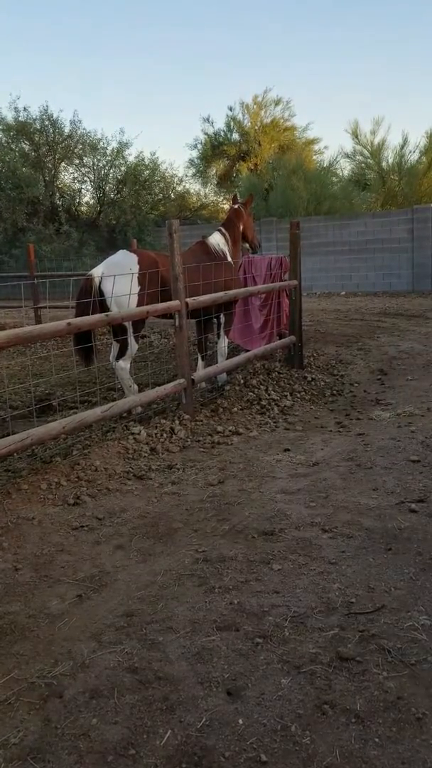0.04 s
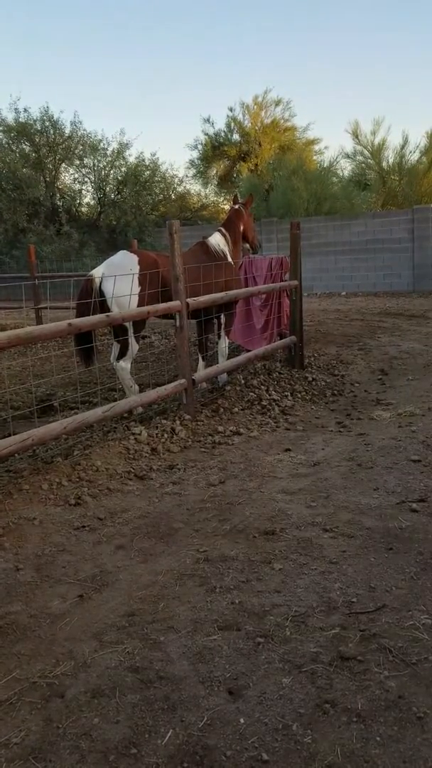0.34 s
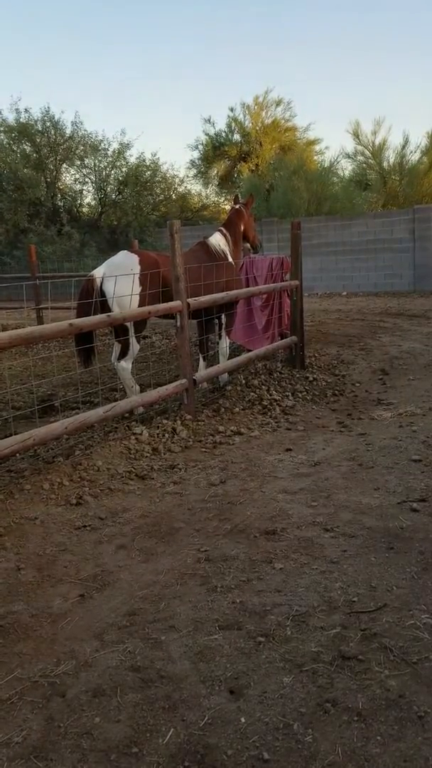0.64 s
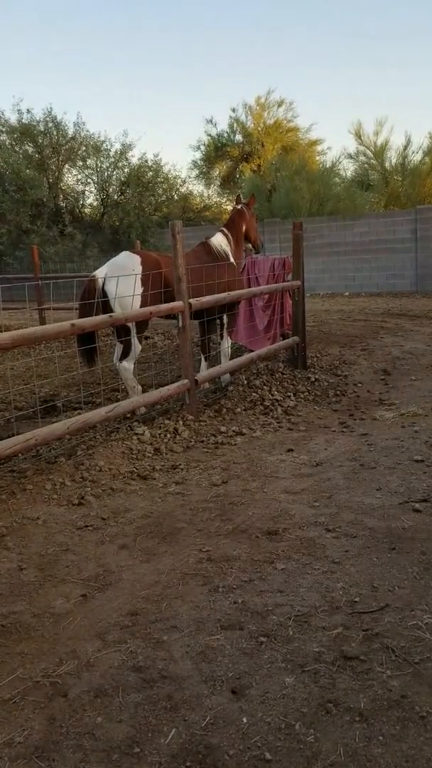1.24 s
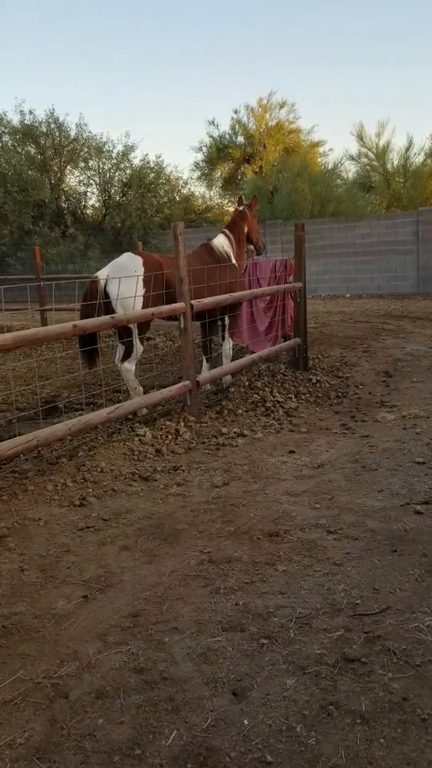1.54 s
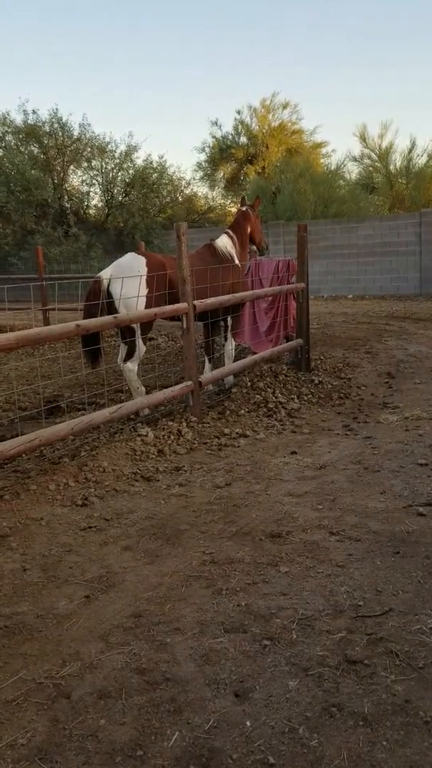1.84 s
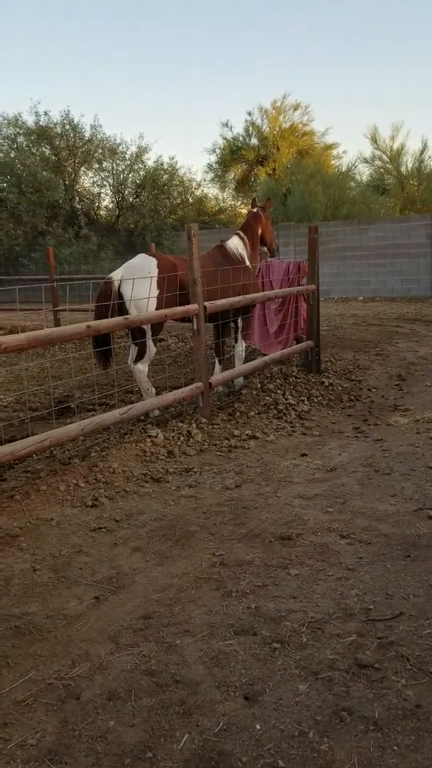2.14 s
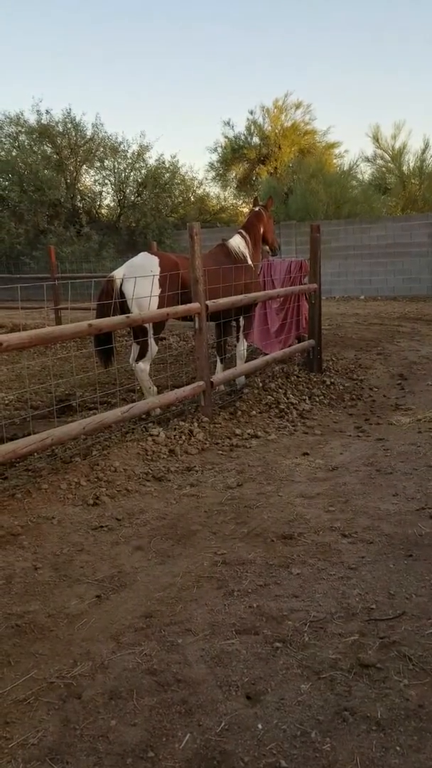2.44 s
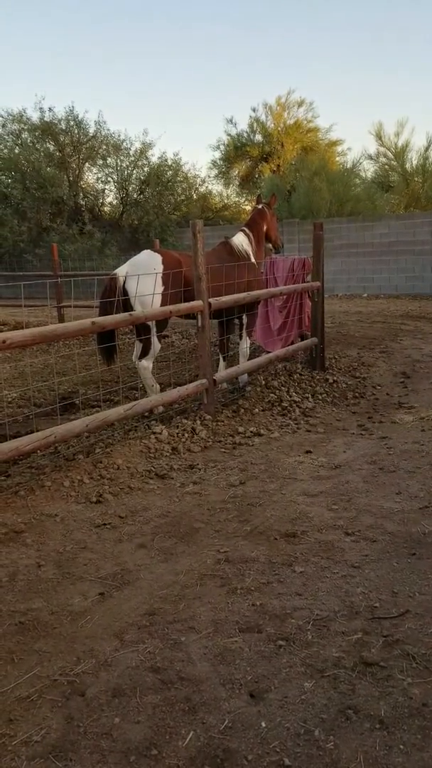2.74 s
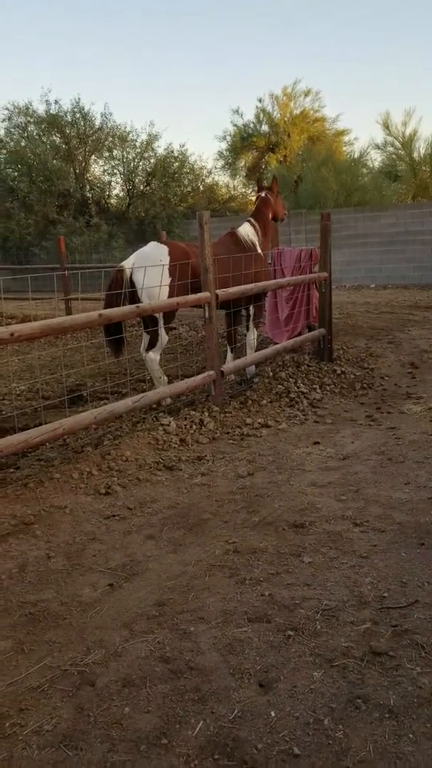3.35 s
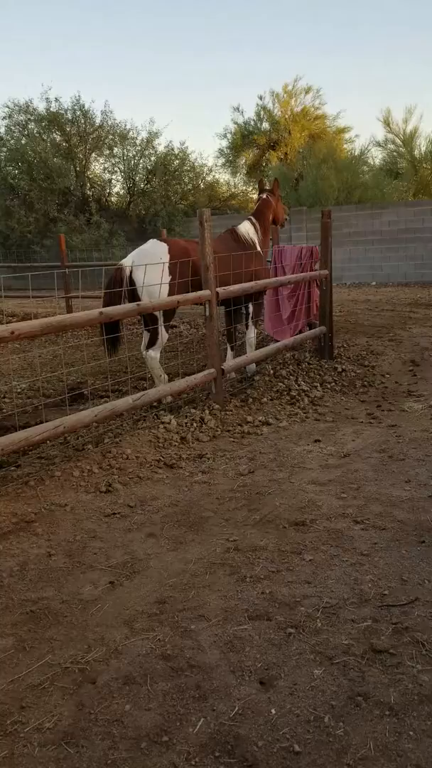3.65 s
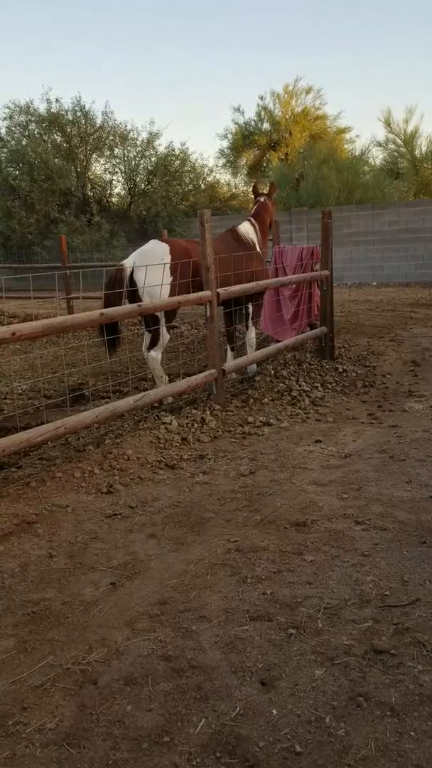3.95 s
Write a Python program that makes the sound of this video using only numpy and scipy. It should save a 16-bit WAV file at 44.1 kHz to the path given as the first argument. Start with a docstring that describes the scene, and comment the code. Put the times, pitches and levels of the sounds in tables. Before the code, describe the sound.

A horse neighs loudly in an outdoor dirt yard. First, grit rustles faintly over a distant hum; then soft thumps and a thin squeal lead into the hoarse, shaking call, caught in stereo with a short echo.

```python
"""A low hum and rumble far off, and grit rustling in a dirt yard, on a stereo microphone.
About three seconds in come soft thumps on packed earth, then a horse whinnies: a thin falling squeal
breaks into a loud, hoarse, shaking neigh that sinks in pitch. Its vocal folds beat unevenly, with a rasp
of air and a second, whistling voice of the larynx, coloured by throat and nose.
The yard adds a short echo to the call."""
import sys
import numpy as np
from scipy import signal
from scipy.fft import rfft, irfft
from scipy.io import wavfile
from scipy.ndimage import uniform_filter1d

SR = 44100
rng = np.random.default_rng(int(sys.argv[2]) if len(sys.argv) > 2 else 0)


def file_out(sig):
    """Save sig as 16-bit WAV at sys.argv[1]."""
    # one column per channel
    cols = np.atleast_2d(sig).T
    # limit, then scale
    lim = np.clip(cols, -1, 1)
    pcm = np.round(lim * 32767).astype(np.int16)
    wavfile.write(sys.argv[1], SR, pcm)


N = 176400

# Colour of the horse's throat and mouth. Each row: frequency in Hz, gain in dB.
THROAT_COLOUR = [(400, -3), (800, -6), (885, -4), (980, -0.5), (1100, 1.5), (1210, 3.5), (1310, -1.5),
                 (1420, -1.5), (1650, -2), (1840, -1), (2030, 0), (2200, -4), (2450, -9), (2630, -11.5),
                 (2860, -24), (3120, -4), (3450, -13), (3850, -12), (4200, -26), (4650, -26.5), (5100, -32),
                 (5900, -24), (6450, -34), (6850, -35.5), (8000, -40.5), (9600, -45), (15000, -44)]


def undb(db):
    """Decibels to gain."""
    return 10 ** (np.asarray(db) / 20)


def unit(x):
    """Scale to rms 1."""
    return x / np.sqrt(np.mean(x ** 2) + 1e-18)


def curve(rows, col=1):
    """A column of a table, joined by straight lines in time."""
    rows = np.array(rows)
    return np.interp(np.arange(N) / SR, rows[:, 0], rows[:, col])


def swell(rows, col=1):
    """Gain from a dB column, opening over the 5 ms before its first row."""
    gate = np.clip((np.arange(N) / SR - rows[0][0]) * 200 + 1, 0, 1)
    return undb(curve(rows, col)) * gate


def across(points, f):
    """A (Hz, value) table read on a log-frequency axis."""
    points = np.array(points)
    return np.interp(np.log(f), np.log(points[:, 0]), points[:, 1])


def shape(x, response):
    """Filter by a function of frequency."""
    f = np.fft.rfftfreq(2 * N, 1 / SR) + 1e-3
    return irfft(rfft(x, 2 * N) * response(f))[..., :N]


def colour(x, points):
    """Filter by a (Hz, dB) table."""
    return shape(x, lambda f: undb(across(points, f)))


def resonate(x, modes, bypass_db):
    """Pass a sound through narrow resonances; some of it goes by them."""
    return shape(x, lambda f: undb(bypass_db)
                 + sum(undb(db) / (1 + 2j * (f - hz) / width) for hz, width, db in modes))


def band(hz, width_hz):
    """Noise in a resonance, rms 1."""
    return unit(shape(rng.standard_normal(N), lambda f: 1 / (1 + ((f - hz) / width_hz) ** 2)))


def wander(rate_hz):
    """Random motion mostly slower than the rate, rms 1."""
    return band(0, rate_hz)


def turn(hz):
    """Phase of an oscillator."""
    return 2 * np.pi * np.cumsum(hz) / SR


def steady(x):
    """Hold a voice at rms 1 so that its envelope alone sets the level."""
    return x / np.sqrt(np.abs(uniform_filter1d(x ** 2, SR // 30)) + 1e-12)


def fade(start, attack, decay):
    """Attack and exponential release, times in seconds."""
    age = np.maximum(np.arange(N) / SR - start, 0)
    return (1 - np.exp(-age / attack)) * np.exp(-np.minimum(age / decay, 20))


def distant_hum():
    """Rumble and a wavering hum from far beyond the yard, wide in the treble."""
    # The far-off air, then the extra colour of its side signal. Each row: frequency in Hz, gain in dB.
    air_colour = [(15, -43), (25, -15.5), (80, -7), (94, -1), (113, -15), (130, -4), (144, -7), (161, -7.5),
                  (174, -11), (222, -10.5), (255, -16.5), (284, -13.5), (316, -17), (361, -15.5),
                  (710, -34), (955, -29), (1550, -32), (2260, -42), (3050, -37), (4450, -37.5), (5090, -31),
                  (5520, -36), (6490, -37), (9460, -43.5), (15800, -40)]
    side_colour = [(30, -29), (140, -18.5), (300, -18), (600, -6.5), (1200, -7), (3000, 2.5), (15000, -3.5)]
    treble_dip = [(2000, 1), (4000, -5.5), (9000, -5.5), (14000, -0.96)]
    mid, side = colour(colour(rng.standard_normal((2, N)), air_colour), treble_dip)
    air = unit(mid + np.array([[1], [-1]]) * colour(side, side_colour))
    return air * undb(-52 + 0.85 * wander(12)) + undb(-54) * band(146.2, width_hz=9)


def grit():
    """Short crunches of dry grit: each a ringing burst of grains with a faint tail."""
    # Each row: start in seconds, relative level in dB, centre in Hz, left minus right in dB.
    crunches = [(0.049, -42, 4700, -3), (0.1775, -48.5, 3740, -2), (0.198, -51, 7480, 1),
                (0.2893, -34.5, 6200, -2), (0.3024, -51, 6070, -4.5), (0.5057, -50.5, 7260, -3.0),
                (0.5883, -49, 3200, -6), (0.63, -49.5, 4930, -2.5), (0.8016, -50.5, 3160, -7),
                (0.8664, -48, 7300, -2), (0.9356, -53.5, 5230, -2.5), (1.5436, -52, 3230, -2.5),
                (1.6402, -54, 7760, 1.0), (1.7175, -51, 7300, -2.5), (1.8253, -47, 7060, -2),
                (1.936, -44, 6850, -4.0), (1.9782, -50, 7940, 2), (2.0943, -49.5, 5130, -5),
                (2.137, -49, 7450, -2), (2.237, -51.5, 8770, 4), (2.4737, -53.5, 9300, 5),
                (2.5366, -55, 7420, -8), (2.5672, -49, 8050, 3), (2.798, -50, 7660, -4),
                (2.9508, -44, 6800, -5), (3.038, -51, 3520, -12)]
    attack_s, decay_s, tail_s = .0006, .0023, .029
    gain_db, grain_spread_db, relative_width = -3.5, 3.5, .19
    size = SR // 5
    age = np.arange(size) / SR
    release = np.exp(-age / decay_s) + undb(-11) * np.exp(-age / tail_s)
    envelope = (1 - np.exp(-age / attack_s)) * release
    out = np.zeros((2, N + size))
    for start, db, hz, pan in crunches:
        grains = rng.standard_normal((2, size)) * undb(grain_spread_db * rng.standard_normal(size))
        ring = signal.lfilter(*signal.iirpeak(hz, 1 / relative_width, fs=SR), grains)
        hiss = np.diff(grains, prepend=0)
        crunch = (unit(ring) + undb(-8) * unit(hiss)) * envelope
        i = int(start * SR)
        out[:, i:i + size] += crunch * undb(db + gain_db + np.array([[pan], [-pan]]) / 2)
    return out[:, :N]


def crackle():
    """Single grains tick faintly at random between the crunches."""
    # Each row: time in seconds, level in dB.
    level = [(0, -77.5), (.9, -67), (1.1, -73.5), (1.55, -77.5), (1.7, -67.5), (2.3, -70.5), (2.7, -66),
             (3.3, -62)]
    # Colour of the grains. Each row: frequency in Hz, gain in dB.
    grain_colour = [(1200, -20), (3000, -10.5), (5500, -6), (6700, -8), (7500, 3), (8400, -13.5),
                    (15000, -9)]
    ticks_per_s, decay_s = 130, .0022
    ticks = (rng.random(N) < ticks_per_s / SR) * undb(2 * rng.standard_normal(N))
    envelope = signal.lfilter([1], [1, -np.exp(-1 / (decay_s * SR))], ticks)
    grains = envelope * rng.standard_normal((2, N))
    return undb(curve(level)) * unit(colour(grains, grain_colour))


def thumps():
    """Dull knocks on packed earth, each a low boom with a dry scuff."""
    # Each row: start in seconds, boom gain in dB, scuff gain in dB.
    knocks = [(3.027, -50, -40.5), (3.039, -21, -61), (3.085, -62, -47)]
    # Colour of scuffed earth. Each row: frequency in Hz, gain in dB.
    scuff_colour = [(150, 5.5), (450, 0), (700, -0.5), (1300, 0.5), (2400, -8.5), (2900, -20), (3500, -8),
                    (4300, -19), (12000, -32)]
    boom_hz, attack_s, boom_decay_s, scuff_decay_s = 100.6, .004, .0096, .027
    t = np.arange(N) / SR
    scuff = unit(colour(rng.standard_normal(N) + 0.49 * rng.standard_normal((2, N)), scuff_colour))
    out = np.zeros((2, N))
    for start, boom_db, scuff_db in knocks:
        boom = np.cos(2 * np.pi * boom_hz * (t - start))
        out += undb(boom_db) * fade(start, attack_s, boom_decay_s) * boom
        out += undb(scuff_db) * fade(start, attack_s, scuff_decay_s) * scuff
    return out


def squeal():
    """The thin, raspy falling tone that opens the call."""
    # Each row: time in seconds, pitch in Hz, relative level in dB.
    glide = [(3.165, 1360, -50), (3.179, 1325, -41), (3.192, 1200, -41.5), (3.207, 1053, -39.5),
             (3.225, 1020, -39.5), (3.255, 1030, -36.5), (3.3, 990, -40), (3.36, 970, -38.5),
             (3.39, 1000, -51.5)]
    jitter, octave_db, rasp_db = .04, -11, -13
    phase = turn(curve(glide) * (1 + jitter * wander(280)))
    tone = np.sin(phase) + undb(octave_db) * np.sin(2 * phase)
    shaky_tone = unit(tone * (1 + .5 * wander(129.5)))
    breath = colour(rng.standard_normal(N), THROAT_COLOUR)
    rasp = unit(colour(breath, [(250, -37), (450, -16)]))
    return (shaky_tone + undb(rasp_db) * rasp) * swell(glide, 2)


def whistle(fold_phase, rough, flutter):
    """The second, whistling voice of the larynx, riding on the beat of the vocal folds."""
    # Each row: time in seconds, pitch in Hz, relative level in dB.
    glide = [(3.195, 2300, -45), (3.205, 2220, -42.5), (3.23, 2080, -48), (3.26, 2120, -39),
             (3.285, 2388, -31), (3.33, 2267, -28), (3.39, 2322, -31.5), (3.53, 2180, -20.5),
             (3.65, 2266, -26), (3.75, 2226, -22.5), (3.8, 1960, -61), (3.91, 1908, -47),
             (3.955, 1806, -19), (4.0, 1848, -34)]
    jitter, fm_depth = .02486, .23
    phase = turn(curve(glide) * (1 + jitter * wander(212)))
    tone = np.sin(phase + fm_depth * rough * np.sin(fold_phase)) * flutter
    return swell(glide, 2) * steady(shape(tone, lambda f: 1 / (1 + (f / 2600) ** 24)))


def neigh():
    """Shaking, unevenly beating vocal folds with a rasp of air each cycle, over a low grunt."""
    # High and low turns of the shake. Each row: time in seconds, pitch in Hz.
    pitch = [(3.245, 717.8), (3.28, 648.7), (3.32, 695.7), (3.35, 632.3), (3.385, 774), (3.42, 600.2),
             (3.46, 601.5), (3.485, 766), (3.512, 689.3), (3.545, 549), (3.587, 740.4), (3.625, 662),
             (3.652, 531.7), (3.675, 554.8), (3.715, 692.8), (3.745, 659.8), (3.77, 455.7), (3.8, 543.6),
             (3.82, 451.5), (3.838, 658.7), (3.862, 654.5), (3.885, 451.7), (3.955, 449.2), (3.967, 655.6),
             (3.985, 650.7), (4.0, 463)]
    # Each row: time in seconds, roughness from 0 to 1.
    hoarseness = [(3.25, 0.47), (3.29, 0.42), (3.33, 0.91), (3.44, 0.6), (3.5, 0.72), (3.545, 0.4),
                  (3.58, 0.75), (3.62, 0.46), (3.7, 0.62), (3.8, 0.76), (3.855, 0.36), (3.9, 0.54),
                  (3.94, 0.37), (4.0, 0.18)]
    # Strength of the fundamental. Each row: time in seconds, relative level in dB.
    chest_level = [(3.23, -60), (3.25, -38.5), (3.28, -25.5), (3.352, -37.5), (3.396, -24), (3.42, -24),
                   (3.446, -31), (3.478, -21.5), (3.598, -25), (3.62, -16.5), (3.656, -26), (3.738, -19),
                   (3.754, -27.5), (3.772, -21), (3.83, -29.5), (3.876, -26), (3.896, -11.5), (3.93, -30.5),
                   (3.984, -28.5), (4.0, -19)]
    # Strength of the overtones. Each row: time in seconds, relative middle and treble levels in dB.
    effort = [(3.23, -56, -40), (3.266, -32.5, -36), (3.284, -46, -28.5), (3.39, -33, -23.5),
              (3.452, -25.5, -22.5), (3.492, -29.5, -23), (3.722, -29, -22), (3.752, -28, -18.5),
              (3.774, -28.5, -24.5), (3.802, -27.5, -20), (3.938, -28.5, -25), (3.944, -29.5, -30.5),
              (3.976, -23, -20.5), (4.0, -32, -22)]
    # Resonances that the fundamental and the first overtones sweep through.
    # Each row: centre in Hz, width in Hz, gain in dB.
    low_modes = [(455, 46, -2.5), (562, 33, -9.5), (669, 22.3, -4), (755, 45, -7)]
    upper_modes = [(873, 46, 4.5), (1104, 73, -7.5), (1192, 120, -3.5), (1287, 26, -4)]
    jitter, shimmer, growl_depth, growl_hz = .06, .45, .35, 135
    dispersion_rad = .55  # the throat spreads each pulse

    rough = np.clip(curve(hoarseness), 0, 1)
    phase = turn(curve(pitch) * (1 + jitter * rough * wander(220)))
    tremble = shimmer * wander(150)
    growl = growl_depth * np.sin(turn(growl_hz * (1 + 0.1992 * wander(40))))
    flutter = 1 + rough * (tremble + growl)
    overtones = unit(sum(np.cos(k * phase + dispersion_rad * k * k) for k in range(2, 17))) * flutter
    rasp = rough * rng.standard_normal(N) * (1 + .5 * np.sin(phase)) * flutter
    fundamental = np.cos(phase) * flutter + undb(-14.5) * band(570, width_hz=150)

    chest = resonate(fundamental, low_modes, bypass_db=-9.5)
    middle = resonate(colour(overtones + 1.3 * rasp, THROAT_COLOUR), upper_modes, bypass_db=-10.5)
    middle = shape(middle, lambda f: 1 / (1 + (820 / f) ** 16) / (1 + (f / 1600) ** 16))
    treble = colour(overtones + 2.4 * rasp, THROAT_COLOUR)
    treble = shape(treble, lambda f: 1 / (1 + (1500 / f) ** 16))
    voice = (undb(-1) * swell(chest_level) * steady(chest)
             + undb(-1.5) * swell(effort) * steady(middle)
             + undb(-2.5) * swell(effort, 2) * steady(treble)
             + undb(-3) * whistle(phase, rough, flutter))
    grunt = undb(-20) * swell(effort) * band(250, width_hz=58)
    return shape(voice, lambda f: 1 / (1 + (332 / f) ** 20)) + grunt


def nose(voice):
    """The nasal passages cut hollows out of the voice."""
    # Each row: centre in Hz, width in Hz, gain at the centre in dB.
    dips = [(2760, 130, -9.5), (5100, 200, -6.5)]
    return shape(voice, lambda f: undb(
        sum(db * np.exp(-((f - hz) / width) ** 2) for hz, width, db in dips)))


def yard(call):
    """The call reaches the microphone's two ports directly, off a near surface and as a short tail."""
    # The near reflection. Each row: delay in seconds, gain in dB.
    echoes = [(.0092, -11.5)]
    # Balance between the ports. Each row: frequency in Hz, left minus right in dB.
    port_balance = [(60, -9), (110, -4), (200, 2.5), (380, -4), (700, 6.5), (1290, -2), (2380, -3),
                    (4400, -7.5), (8120, -1), (15000, 2.5)]
    # Phase between the ports. Each row: frequency in Hz, lead of the left in radians.
    port_phase = [(100, 0), (420, 0.23), (630, 1.32), (800, 1.07), (950, 0.33), (1300, -0.23), (2070, 1.66),
                  (2580, 0.35), (4050, 4), (5770, 4.5), (6800, 4.5), (8000, 7), (15000, 8.5)]
    # Colour of the scattered tail. Each row: frequency in Hz, gain in dB.
    tail_colour = [(300, -16), (700, 0), (2000, -2), (4000, 3), (9000, -1)]
    tail_db, t60_s = -5.5, .25
    t = np.arange(N) / SR
    near = call + sum(undb(db) * np.interp(t - lag, t, call, left=0) for lag, db in echoes)
    split = np.array([[.5], [-.5]])
    at_ports = shape(near, lambda f: undb(split * across(port_balance, f))
                     * np.exp(1j * split * across(port_phase, f)))
    tail = colour(rng.standard_normal((2, N)), tail_colour) * fade(.0031, .00063, t60_s / np.log(1000))
    scattered = signal.fftconvolve(call[None], unit(tail) / np.sqrt(N), axes=1)[:, :N]
    return at_ports + undb(tail_db) * scattered


def scene():
    """The horse in the yard, the ground and the far surroundings, as they meet at the microphone."""
    whinny = yard(nose(neigh() + squeal()))
    return whinny + grit() + crackle() + thumps() + distant_hum()


def record(dry):
    """The recorder cuts the top steeply."""
    top_hz = 15850
    return signal.sosfilt(signal.ellip(10, .2, 80, top_hz, fs=SR, output="sos"), dry)


dry = scene()
out = record(dry)
file_out(out)
```